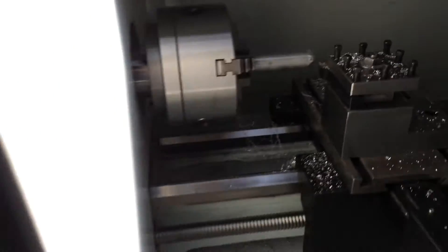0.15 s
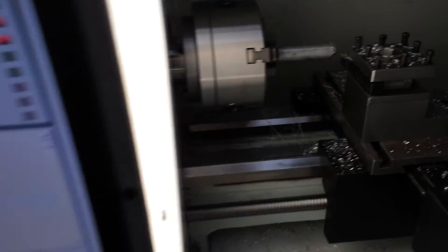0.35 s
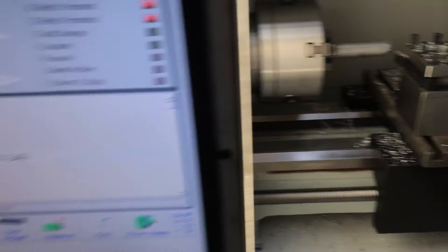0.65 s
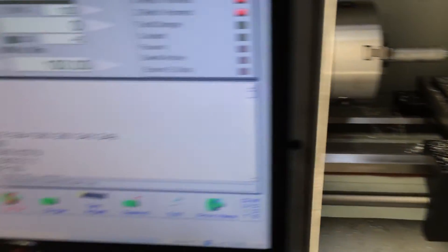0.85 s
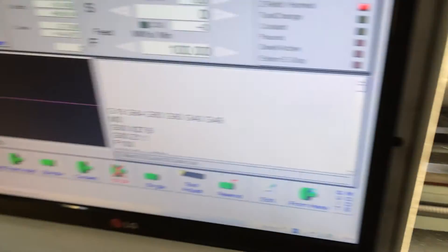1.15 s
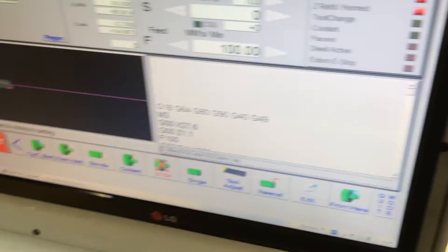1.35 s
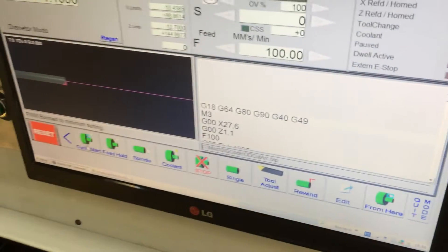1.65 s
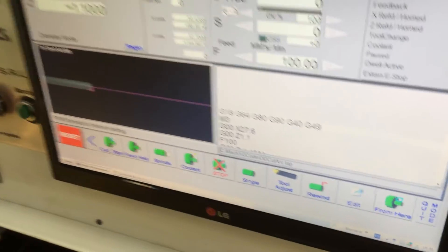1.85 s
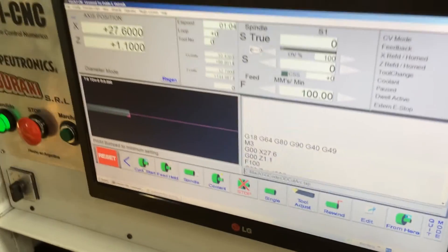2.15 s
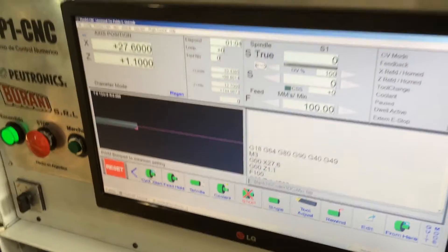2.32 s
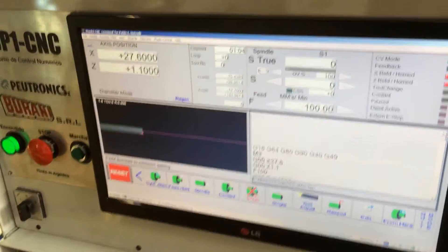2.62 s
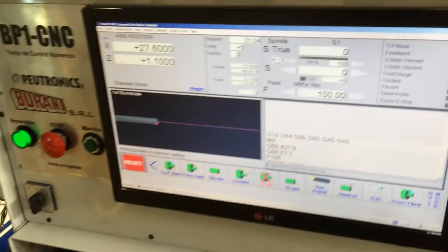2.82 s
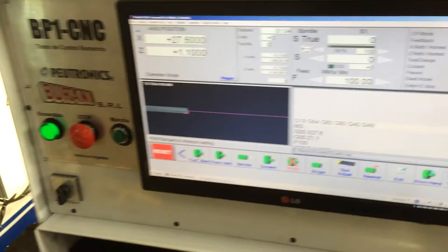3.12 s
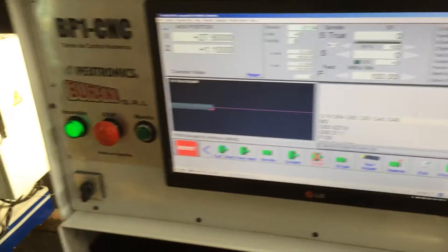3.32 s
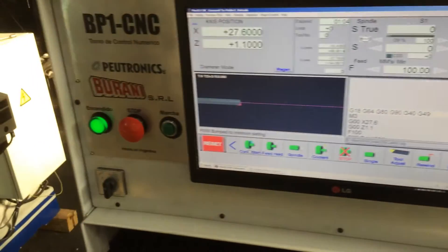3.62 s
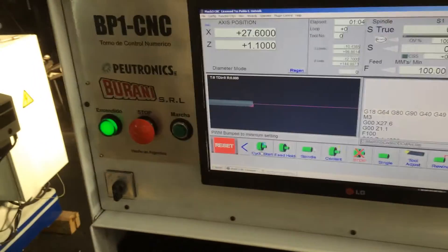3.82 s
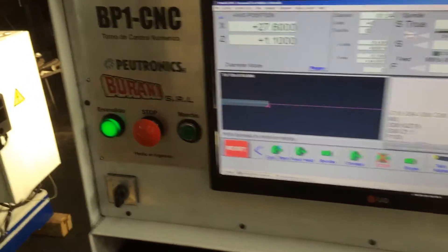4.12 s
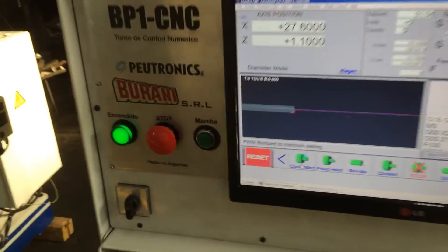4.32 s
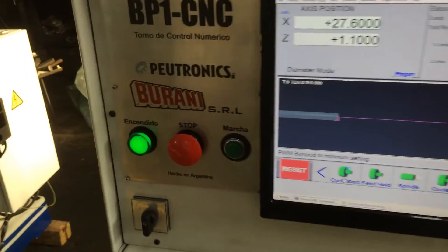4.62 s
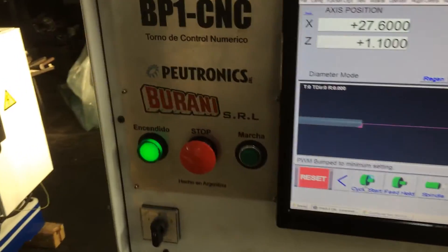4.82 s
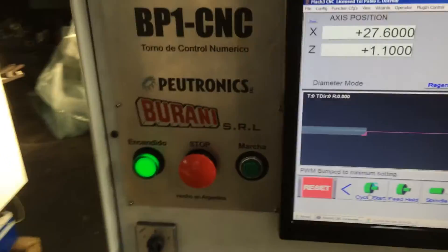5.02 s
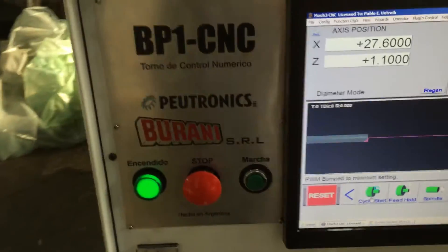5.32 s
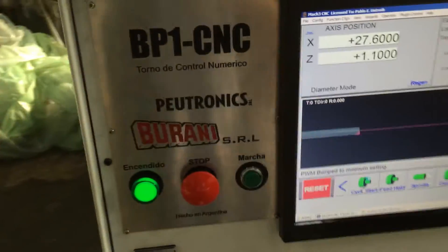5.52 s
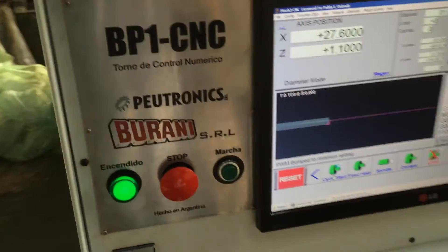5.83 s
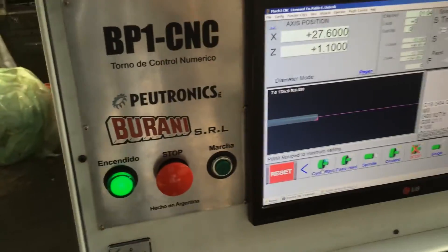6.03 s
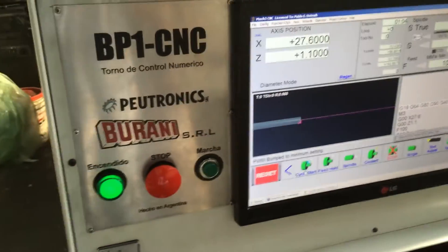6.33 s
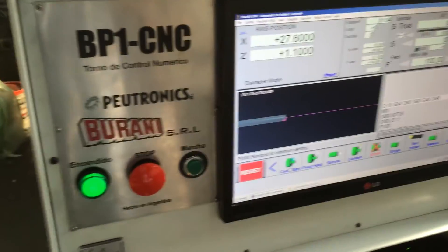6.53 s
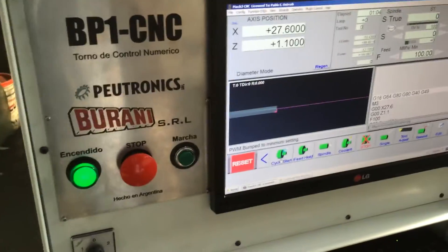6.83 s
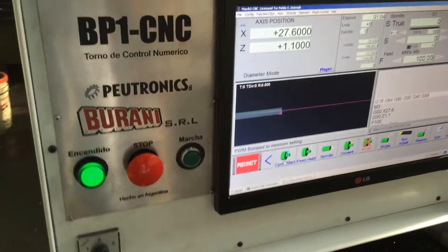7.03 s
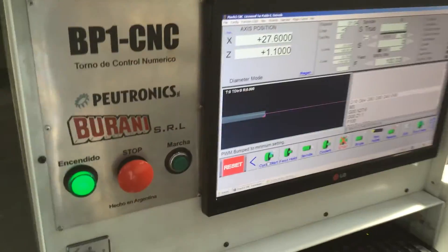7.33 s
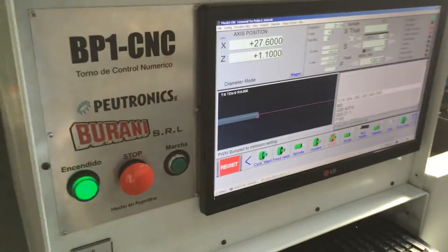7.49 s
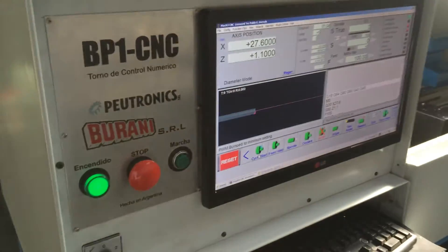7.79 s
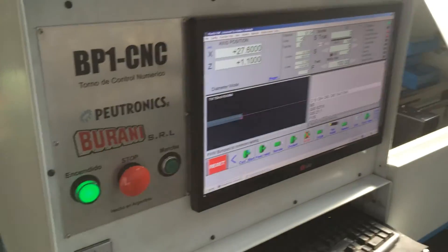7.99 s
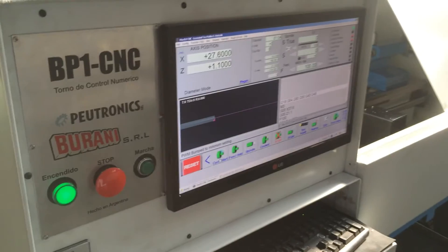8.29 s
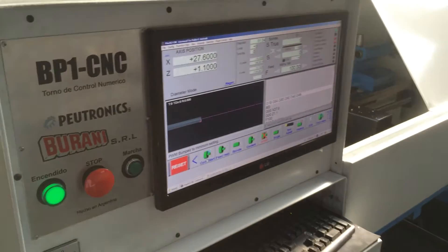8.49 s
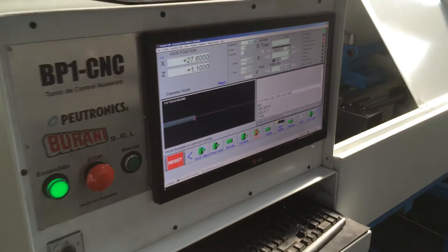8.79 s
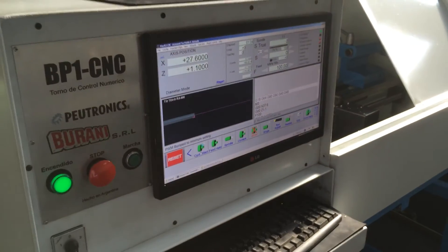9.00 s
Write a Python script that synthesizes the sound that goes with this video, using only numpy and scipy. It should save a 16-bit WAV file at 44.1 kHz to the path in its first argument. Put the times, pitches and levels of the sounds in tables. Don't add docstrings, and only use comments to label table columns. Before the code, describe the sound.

A strong air jet hisses with a thin wavering whistle in a machine workshop, cuts out to a low hum, then blasts back with rumbling sheet-metal thumps.

```python
import sys
import numpy as np
from scipy import signal
from scipy.fft import rfft, irfft
from scipy.io import wavfile
from scipy.ndimage import uniform_filter1d

SR = 44100
rng = np.random.default_rng(int(sys.argv[2]) if len(sys.argv) > 2 else 0)


def digitize_waveform(pressure):
    field = np.atleast_2d(pressure).T
    bounded = np.clip(field, -1, 1)
    quanta = np.round(bounded * 32767).astype(np.int16)
    wavfile.write(sys.argv[1], SR, quanta)


def decibels_to_gain(level_db):
    exponent = np.asarray(level_db, float) / 20
    return 10 ** exponent


N = 403498
HOP = 128
VALVE_SHUT_S, VALVE_OPEN_S = 6.15, 7.498
USUAL_FLOW_DB = -32

# time [s], level [dB].
FLOW = [(0, -34), (.12, -33.5), (.18, -30.5), (.7, -31.5), (1.0, -29.5), (1.5, -30.5), (2.0, -33.5),
        (2.7, -34), (3.05, -33), (3.7, -33.5), (4.3, -36), (4.75, -32.5), (5.42, -36), (6.13, -29),
        (7.52, -23.5), (7.92, -31), (8.02, -27), (9.15, -32)]
# start [s], rattle length [s], level [dB], upper modes [dB].
BLOWS = [
    (7.648, 0.036, -32.5, -3),
    (7.708, 0.06, -30, -9),
    (7.796, 0.1, -35, -7),
    (7.925, .03, -44.5, -3.5),
    (7.99, .02, -39, -10.5),
    (8.074, 0.06, -50, -6),
    (8.172, 0.059, -50.5, -32),
]


def jet():
    # frequency [Hz], density [dB per Hz].
    jet_colour = [(240, -36.5), (400, -31.5), (910, -24.5), (1890, -15), (2520, -14.5), (3860, -11),
                  (4170, -9.5), (4430, -4), (4850, -8.5), (13700, -8.5), (15200, -8)]
    zones_hz = (2200, 7600, 13000)
    size = 4 * HOP
    frames, hz = N // HOP + 5, np.fft.rfftfreq(size, 1 / SR)
    body_db, roar_db, splash_db = air(np.arange(frames) * HOP / SR)

    a, b, patches, gusts = rng.standard_normal((frames, len(hz), 4)).T
    patches = evened(uniform_filter1d(uniform_filter1d(patches, size=8, axis=0), size=20, axis=1))
    flicker = evened(uniform_filter1d(uniform_filter1d(gusts, size=90, axis=0), size=3, axis=1))

    log_hz, log_zones = np.log(hz + 1), np.log(zones_hz)
    roar = np.interp(log_hz, log_zones, [1, 0.0058, 0.013])[:, None]
    splash = np.interp(log_hz, log_zones, [0.11, 0.018, 1])[:, None]
    tilt_db = roar * (roar_db - np.median(roar_db)) + splash * (splash_db - np.median(splash_db))

    colour = decibels_to_gain(read(jet_colour, hz))
    in_body = (hz > 5000) & (hz < 8400)
    unit = np.sqrt(np.sum(colour ** 2) / np.sum(colour[in_body] ** 2))
    z = (a + 1j * b) * colour[:, None] * decibels_to_gain(0.78 * patches + 0.61 * flicker)
    plain = signal.istft(z, nperseg=size, noverlap=3 * HOP)[1]
    shaped = signal.istft(z * decibels_to_gain(body_db + tilt_db), nperseg=size, noverlap=3 * HOP)[1]
    return shaped[:N] * unit / np.std(plain)


def air(t):
    # start [s], length [s], body gain [dB], splash gain [dB].
    sweeps = [(.46, 0.19, 4, 5.5), (.79, .09, 1.5, 7), (.88, 0.094, 3, 1.5), (.2, 0.28, 1, 3),
              (.97, .4, -0.5, 3.5), (1.57, 0.15, 2.5, 5), (2.17, .06, 6, 14.5), (2.24, 0.075, -2.5, -6),
              (2.35, 0.35, 1, 6.5), (2.71, .06, -5, -3), (2.98, 0.17, -0.5, 2.5), (4.46, .09, 0, 3),
              (4.67, 0.18, 1.5, 5), (4.94, 0.14, 1.5, 6), (5.22, 0.12, 4.5, 5), (7.54, 0.21, 0, 3),
              (7.98, .08, 1, 1.5), (8.33, 0.14, -4.5, -6.5), (8.56, 0.14, -3.5, -4), (8.9, 0.15, 2.5, 2.5)]
    # start [s], length [s], roar gain [dB].
    hollows = [(.05, 0.76, -0.5), (.86, .11, 6), (1.35, 0.69, 1.5), (2.08, 0.1, 4.5), (2.42, 0.34, -3.5),
               (4.47, .32, 4.5), (4.98, 0.12, 3), (7.5, 0.11, 3), (7.72, 0.26, -2), (8.0, 0.069, 1),
               (8.12, .6, -3.5)]
    flow_db, = curves(FLOW, t)
    excess_db = flow_db - USUAL_FLOW_DB
    body_gain, splash_gain = stretches(sweeps, t)
    roar_gain, = stretches(hollows, t)
    body_db = flow_db + body_gain - valve_loss(t, db_per_s=85, deepest_db=48)
    roar_db = -39.3 + 0.05 * excess_db + roar_gain - valve_loss(t, db_per_s=41, deepest_db=27)
    splash_db = -32 + 0.23 * excess_db + splash_gain - valve_loss(t, db_per_s=150, deepest_db=43)
    return body_db, roar_db - body_db, splash_db - body_db


def stretches(rows, t):
    edge_s = 0.035
    s, length, *gains = np.transpose(rows)[:, :, None]
    on = (np.tanh((t - s) / edge_s) - np.tanh((t - s - length) / edge_s)) / 2
    return [np.sum(g * on, axis=0) for g in gains]


def valve_loss(t, db_per_s, deepest_db):
    opening_s, settling_s, bend = .05, .012, 2.3
    ringing_db = deepest_db * np.tanh(db_per_s * np.maximum(t - VALVE_SHUT_S, 0) / deepest_db)
    return ringing_db * np.clip((VALVE_OPEN_S + settling_s - t) / opening_s, 0, 1) ** bend


def whistle():
    # time [s], frequency [Hz].
    pitch_hz = [(0, 4450), (3, 4455), (6, 4460), (7.5, 4450), (9.15, 4465)]
    # multiple of the pitch, level against the hiss body [dB].
    overtones = [(2, -3.5), (3, -6.5)]
    waver_hz, width_hz = 24, 80
    t = np.arange(N) / SR
    coarse = t[::HOP]
    levels = (whistle_level(coarse), *air(coarse))
    level_db, body_db, _, splash_db = (np.interp(t, coarse, c) for c in levels)
    level_db = level_db + 2.5 * drift(.012)

    scoop_hz = 300 * np.exp(-np.clip(t - VALVE_OPEN_S, 0, 1) / .011) * (t > VALVE_OPEN_S - .03)
    hz = curves(pitch_hz, t)[0] - scoop_hz + waver_hz * drift(0.02004)
    turn = np.exp(2j * np.pi * np.cumsum(hz) / SR)

    a, b = rng.standard_normal((2, N))
    pole = np.exp(-np.pi * width_hz / SR)
    turbulence = signal.lfilter([1], [1, -pole ** 3], a + 1j * b)
    ring = signal.lfilter([1], [1, -pole], turbulence) * turn
    size, phase = abs(ring) ** 0.59, np.angle(ring)

    tone = evened(size * np.cos(phase)) * decibels_to_gain(-1.87 + level_db)
    tone = tone + decibels_to_gain(-13) * hall(tone, .3)
    upper = sum(decibels_to_gain(db) * np.cos(k * phase) for k, db in overtones) * evened(size)
    shut_db = -90 * np.clip(t - VALVE_SHUT_S, 0, 1) * (t < VALVE_OPEN_S)
    return tone + decibels_to_gain(0.66 * body_db + 0.42 * level_db + 1.3 * splash_db + shut_db) * upper


def whistle_level(t):
    # middle [s], length [s], gain [dB].
    locks = [(0.075, 0.015, 5.5), (0.197, 0.073, 3.5), (0.438, 0.054, 3), (.64, 0.035, 5), (0.785, .05, 1),
             (0.995, 0.07, -8), (1.423, 0.041, 3.5), (1.62, 0.12, 7.5), (2.14, 0.082, 8.5),
             (2.453, 0.053, -8), (2.72, 0.2, -6), (3.06, 0.074, 8), (3.17, 0.033, 11.5), (3.245, 0.044, 7),
             (3.353, 0.032, 4.5), (3.445, 0.052, 3), (3.517, 0.041, 0), (3.677, 0.099, 6), (4.396, 0.03, 2),
             (4.68, 0.053, 6), (4.802, 0.041, 9), (5.233, 0.036, -11), (5.317, 0.044, 5), (5.932, 0.13, -3),
             (7.529, 0.02, 2.5), (7.892, 0.039, 0), (8.232, 0.096, 5.5), (8.491, 0.029, 7.5),
             (8.655, 0.032, 2), (9.13, 0.11, 8)]
    drop_db, drop_s = 8, .05
    locks_db = sum(db * np.exp(-(2 * (t - s) / length) ** 2 / 2) for s, length, db in locks)
    echo_db = valve_loss(t, db_per_s=47, deepest_db=200)
    direct_db = valve_loss(t, drop_db / drop_s, drop_db)
    flow_db, = curves(FLOW, t)
    return -33.5 + 0.82 * (flow_db - USUAL_FLOW_DB) + locks_db - (echo_db + direct_db)


def panel():
    # frequency [Hz], width [Hz], level [dB].
    low_modes = [(80, 34, -32), (127, 27, 1), (155, 27, 3.5), (201, 12, -5)]
    # frequency [Hz], width [Hz], level [dB].
    high_modes = [(244, 42, 3), (317, 33, 2.5), (394, 27, -13)]
    knocks_per_s = 700
    t = BLOWS[0][0] + np.arange(SR * 3 // 4) / SR
    knocks = rng.standard_normal(len(t)) * (rng.random(len(t)) < knocks_per_s / SR)
    steady = []
    for modes in (low_modes, high_modes):
        x = evened(sum(decibels_to_gain(db) * resonate(resonate(knocks, f, w), f, w) for f, w, db in modes))
        steady.append(x / np.sqrt(uniform_filter1d(x ** 2, size=2600) + 0.065))
    low, high = steady
    sound = shaking(t, t60=0.12, upper=0) * low + shaking(t, t60=.25, upper=1) * high
    out, start = np.zeros(N), round(t[0] * SR)
    out[start:start + len(t)] = sound
    return out


def shaking(t, t60, upper):
    rise_s = 0.013
    s, length, db, upper_db = np.transpose(BLOWS)[:, :, None]
    fade_db = -60 * np.maximum(t - s - rise_s - length, 0) / t60
    blows = np.clip((t - s) / rise_s, 0, 1) * decibels_to_gain(db + upper * upper_db + fade_db)
    return np.sqrt(np.sum(blows ** 2, axis=0))


def leaks():
    # middle [s], level [dB], length [s].
    puffs = [
        (6.615, -57, .022),
        (7.08, -76, .02),
    ]
    t = np.arange(N) / SR
    band = signal.butter(2, (4500, 12500), "band", fs=SR, output="sos")
    hiss = evened(signal.sosfilt(band, rng.standard_normal(N)))
    return hiss * sum(decibels_to_gain(db) * np.exp(-((t - s) / length) ** 2) for s, db, length in puffs)


def shop():
    # frequency [Hz], density [dB per Hz].
    wash_colour = [(15, -44), (28, -15), (59, -6), (120, -4.5), (197, -4), (356, -15), (700, -13),
                   (1050, -11.5), (1350, -16.5), (2000, -13.5), (2900, -22.5), (5000, -27), (10000, -32),
                   (15200, -47)]
    # frequency [Hz], level [dB].
    hum = [(199.2, -60), (672.9, -67.5), (1276, -73), (1615, -70), (1938, -66), (2035, -64), (2681, -77)]
    # time [s], gain [dB].
    hum_fade = [(0, -4.5), (2, -3), (4, -0.5), (6, 0), (6.4, 3.5), (7.4, 3), (8, 0.5), (9.15, 1.5)]
    t, hz = np.arange(N) / SR, np.fft.rfftfreq(N, 1 / SR)
    fade_db, = curves(hum_fade, t)
    colour = decibels_to_gain(read(wash_colour, hz))
    unit = np.sqrt(np.sum(colour ** 2) / np.sum(colour[(hz > 40) & (hz < 450)] ** 2))
    wash = evened(irfft(rfft(rng.standard_normal(N)) * colour, N)) * unit
    near_db = 7 * np.exp(-(t / 0.52) ** 2)
    level_db = -52.5 + 0.65 * fade_db + near_db
    tones = 0
    for f, db in hum:
        level = decibels_to_gain(db - 3 + 2.5 * drift(.05)) * np.sqrt(2)
        tones = tones + level * np.cos(2 * np.pi * f * t + .8 * drift(.06))
    return wash * decibels_to_gain(level_db - 3.5 + .7 * drift(.08)) + tones * decibels_to_gain(fade_db)


def hall(x, t60):
    t = np.arange(SR // 2) / SR
    tail = rng.standard_normal(len(t)) * decibels_to_gain(-60 * t / t60) * np.minimum(t / 0.0011, 1)
    return signal.fftconvolve(x, tail / np.linalg.norm(tail))[:N]


def resonate(x, hz, width_hz):
    turn = np.exp(2j * np.pi * hz * np.arange(len(x)) / SR)
    r = np.exp(-np.pi * width_hz / SR)
    return 2 * (turn * signal.lfilter([1 - r], [1, -r], x / turn)).real


def evened(x):
    return x / np.sqrt(np.mean(x ** 2) + 1e-20)


def drift(seconds):
    size = max(int(seconds * SR), 1)
    return evened(uniform_filter1d(uniform_filter1d(rng.standard_normal(N), size), size))


def read(points, hz):
    f, value = np.transpose(points)
    return np.interp(np.log(hz + 1), np.log(f + 1), value)


def curves(rows, t):
    s, *columns = np.transpose(rows)
    return [np.interp(t, s, c) for c in columns]


def scene():
    noise = jet() + shop()
    low = signal.sosfilt(signal.butter(2, (450, 2800), "band", fs=SR, output="sos"), noise)
    streaked = noise + decibels_to_gain(-9) * hall(low, .25)
    return np.tile(streaked + whistle() + leaks() + panel(), (2, 1))


def thinned(x):
    # frequency [Hz], limit [dB].
    weak_limit = [(5200, -40), (6000, -13), (9000, -10), (15000, -7.5)]
    hz, _, z = signal.stft(x, SR, nperseg=2048, noverlap=1536)
    power = abs(z) ** 2
    near = uniform_filter1d(uniform_filter1d(power, size=3, axis=0), size=2, axis=1)
    around = uniform_filter1d(uniform_filter1d(power, size=60, axis=0), size=2, axis=1)
    hearing = decibels_to_gain(2 * (-99 + 2.5e-3 * (hz - 15000)))[:, None]
    weak = near < (around + hearing) * decibels_to_gain(2 * read(weak_limit, hz))[:, None]
    weak = uniform_filter1d(uniform_filter1d(weak * 1., size=4, axis=0), size=3, axis=1) > .05
    return signal.istft(np.where(weak, 0, z), SR, nperseg=2048, noverlap=1536)[1][:N]


def roll_off(x):
    return signal.sosfilt(signal.butter(12, 16570, fs=SR, output="sos"), x)


def record(dry):
    lowpass = signal.firwin(1023, 15300, window=("kaiser", 9), fs=SR)
    mono = signal.oaconvolve(thinned(dry[0]), lowpass, "same")
    return roll_off(np.tile(mono, (2, 1)))


dry = scene()
out = record(dry)
digitize_waveform(out)
```